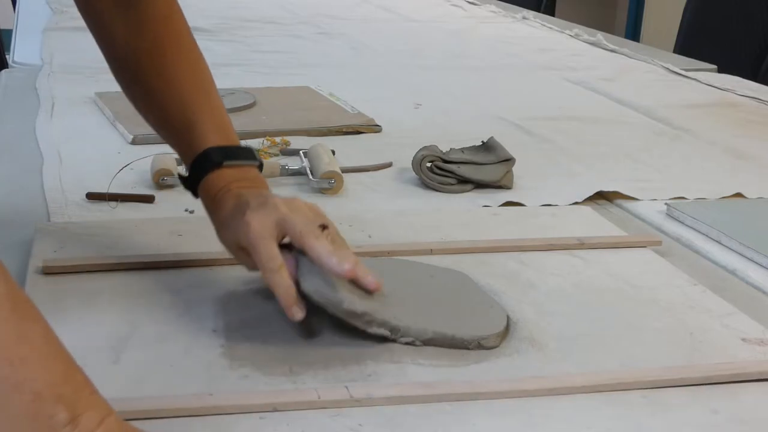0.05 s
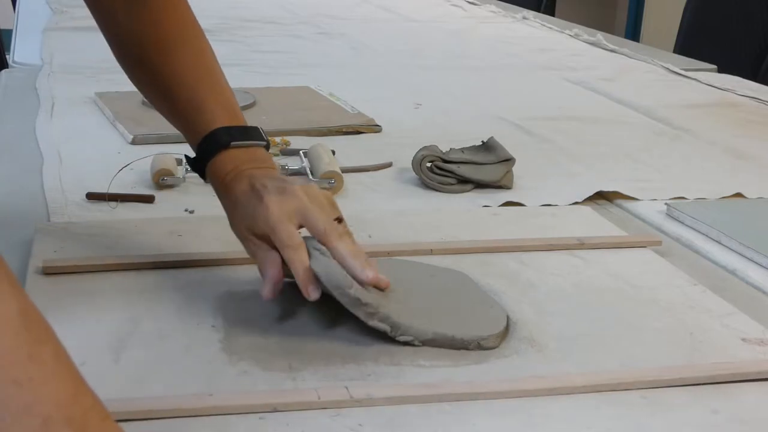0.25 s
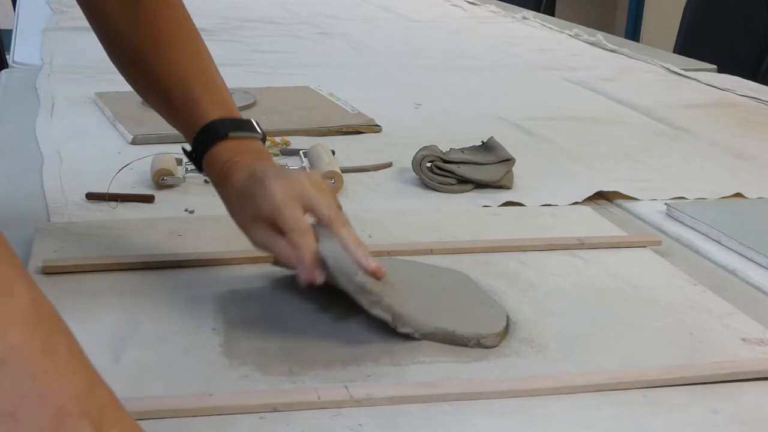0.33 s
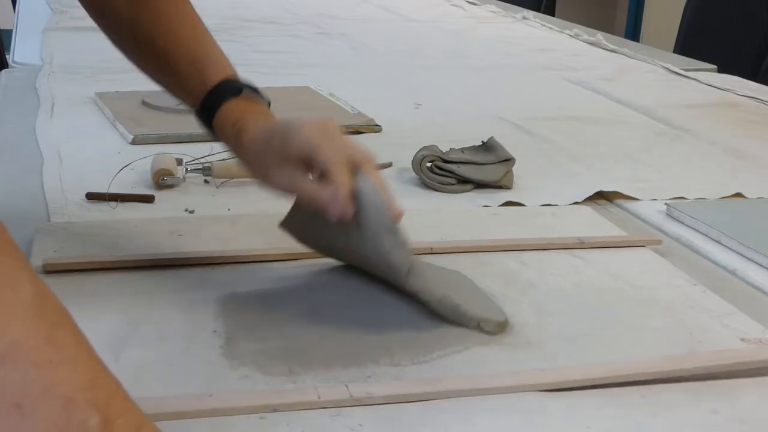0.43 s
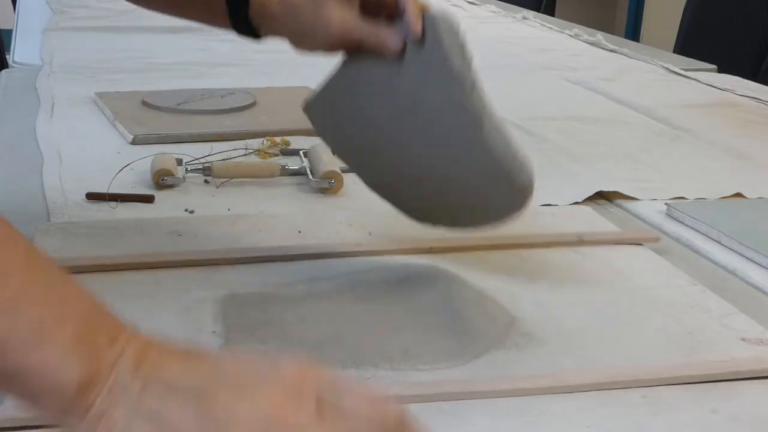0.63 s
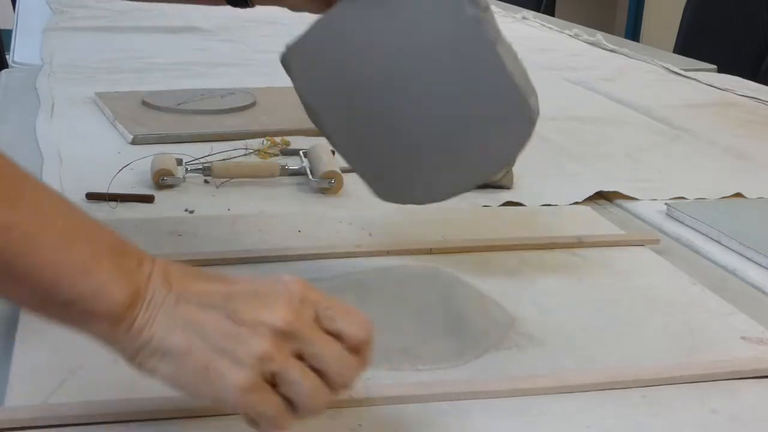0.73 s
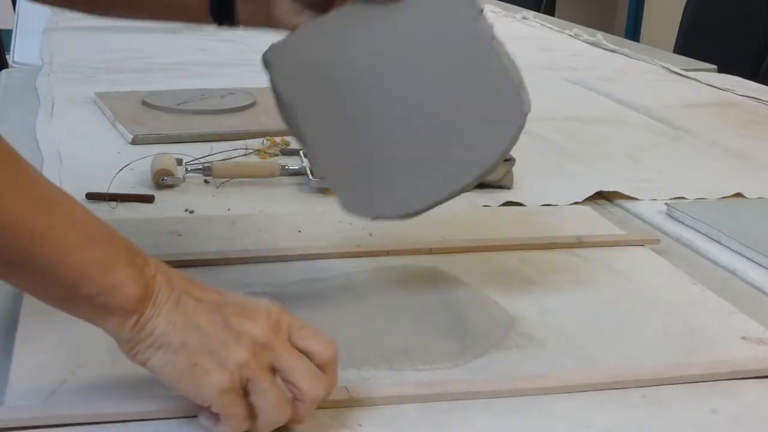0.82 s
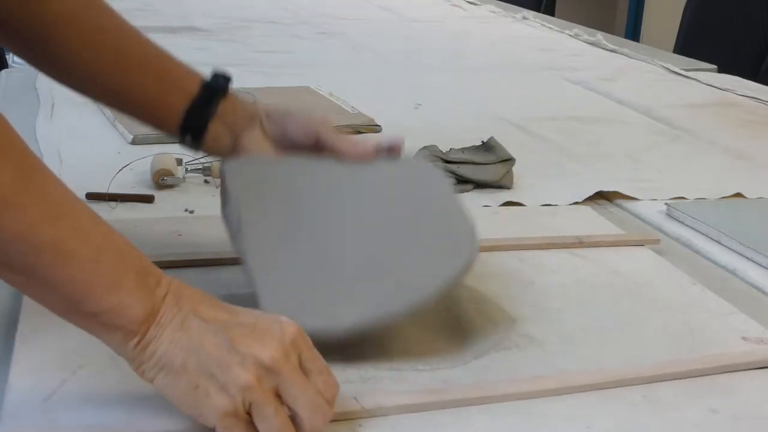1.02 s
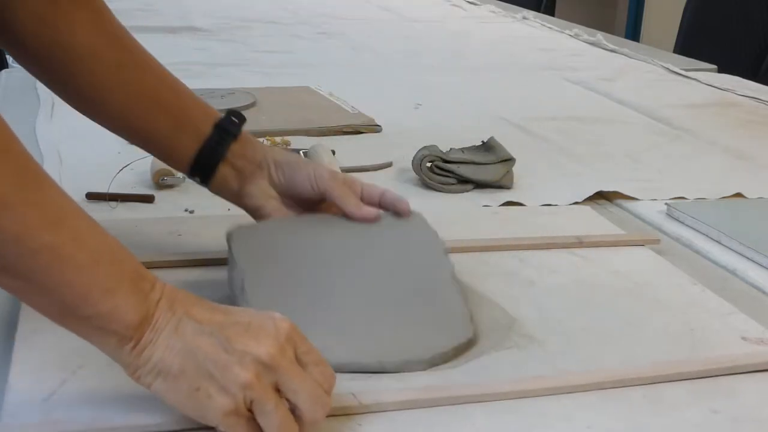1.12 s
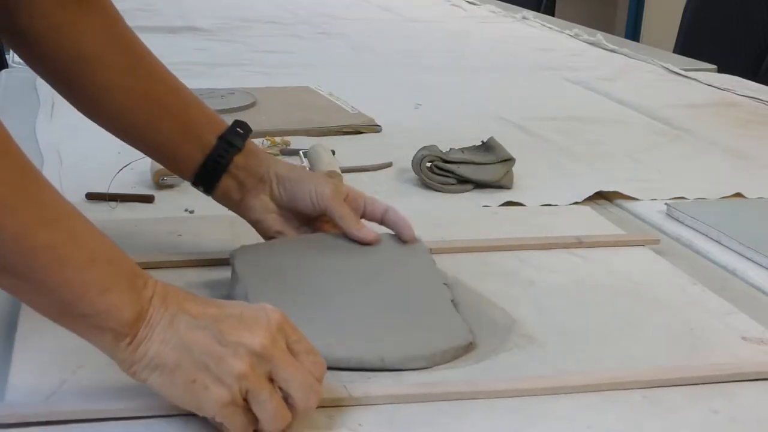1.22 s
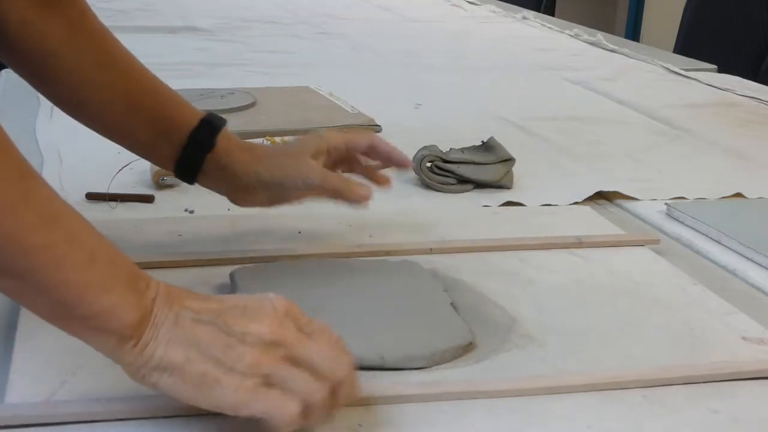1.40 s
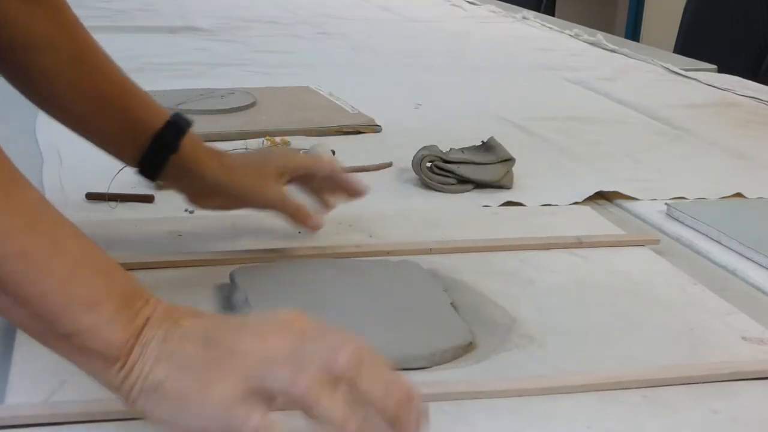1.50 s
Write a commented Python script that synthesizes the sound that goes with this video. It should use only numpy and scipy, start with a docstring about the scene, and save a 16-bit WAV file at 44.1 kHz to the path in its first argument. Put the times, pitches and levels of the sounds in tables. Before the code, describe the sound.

A heavy clay slab thuds onto a wooden worktable, then hands softly rub and turn it.

```python
"""Clay on a wooden worktable, heard close in stereo, in a studio with murmuring ventilation.
Hands slide on the clay; at 0.2 s an edge of the heavy slab scuffs and slaps down, then the whole
weight thuds and the top judders. From about 0.5 s hands peel, rub and turn the clay, with soft,
dull bumps and a few squeaks of damp skin. Near 1.4 s they set it down with a firmer bump.
The room rings behind each blow."""
import sys
import numpy as np
from scipy import signal
from scipy.fft import rfft, irfft
from scipy.io import wavfile

SR = 44100
rng = np.random.default_rng(int(sys.argv[2]) if len(sys.argv) > 2 else 0)


def dump(signal):
    """Clip the signal to [-1, 1] and save it as 16-bit WAV at the path in sys.argv[1]."""
    limited = np.clip(np.atleast_2d(signal).T, -1, 1)
    pcm = np.round(limited * 32767).astype(np.int16)
    wavfile.write(sys.argv[1], SR, pcm)


N = 68355


def amp(db):
    """Decibels to gain."""
    return 10 ** (np.asarray(db) / 20)


def unit(x):
    """Scales to rms 1."""
    return x / np.sqrt(np.mean(x ** 2) + 1e-20)


def read(points, hz, column=1):
    """Reads one column of a table along log frequency."""
    columns = np.transpose(points)
    return np.interp(np.log(hz + 1), np.log(columns[0]), columns[column])


def add(mix, start_s, sound):
    """Mixes a sound in at a time."""
    part = mix[max(round(start_s * SR), 0):][:len(sound)]
    part += sound[:len(part)]


def cut(x, hz, kind="low", order=2):
    """Low-pass or high-pass."""
    return signal.sosfilt(signal.butter(order, hz, kind, fs=SR, output="sos"), x)


def colour(noise, spectrum):
    """Gives a noise a spectrum, at rms 1."""
    gain = amp(read(spectrum, np.fft.rfftfreq(N, 1 / SR)))
    return unit(irfft(rfft(noise) * gain, N))


def burst(samples, decay_s):
    """Dying noise with an energy of 1."""
    noise = rng.standard_normal(samples) * np.exp(-np.arange(samples) / SR / decay_s)
    return noise / np.linalg.norm(noise)


def ring(modes):
    """Dying tones after one tap; a mode's level is its gain at resonance."""
    t = np.arange(SR // 2) / SR
    return sum(amp(db - 60 * t / t60) * 2 * np.log(1000) / (t60 * SR) * np.cos(2 * np.pi * hz * t)
               for hz, db, t60 in modes)


# room tone of the studio (f/Hz, relative level/dB)
VENT_SPECTRUM = [(25, -32), (50, -8), (90, -5), (150, 2.5), (300, -12), (365, -7), (391, 4.5), (420, -13.5),
                 (550, -9), (1000, -15), (2500, -23.5), (5000, -30), (8000, -43.5), (10500, -41.5),
                 (15500, -56)]
# its likeness at the left and right microphones (f/Hz, coherence/0-1)
VENT_COHERENCE = [(30, 0.96), (150, 0.94), (1000, 0), (4000, 1), (10000, 0.8)]
def ventilation():
    """A steady murmur of air behind everything, narrow in the bass and widest near 1 kHz."""
    mid, side = (colour(noise, VENT_SPECTRUM) for noise in rng.standard_normal((2, N)))
    coherence = read(VENT_COHERENCE, np.fft.rfftfreq(N, 1 / SR))
    mid = irfft(rfft(mid) * np.sqrt((1 + coherence) / 2), N)
    side = irfft(rfft(side) * np.sqrt((1 - coherence) / 2), N)
    return amp(-53) * np.array([mid + side, mid - side])


# reverberation from all round the studio (f/Hz, t60/s, level/dB, side against mid/dB)
ROOM_BANDS = [(80, 0.86, -1, -22), (166, 0.37, -7, -25), (346, 0.5, -4.5, -12), (650, 0.64, -14, -7.5),
              (1280, 0.61, -6, -8), (3140, 0.59, -10, -11), (6300, 0.62, -3.5, -24),
              (10800, 0.58, -2.5, -1)]
def room_tail(x, rise_s=0.0083):
    """One diffuse tail, each band dying at its own speed and with its own stereo width."""
    hz, t, bands = signal.stft(rng.standard_normal((2, SR)), SR, nperseg=256)
    t60, level_db, side_db = (read(ROOM_BANDS, hz, column)[:, None] for column in (1, 2, 3))
    equal_energy = np.sqrt(2 * np.log(1000) / (t60 * SR))
    bands *= amp(level_db - 60 * t / t60) * equal_energy
    bands[1] *= amp(side_db)
    rise = np.minimum(np.arange(SR) / SR / rise_s, 1)
    tail = signal.istft(bands, SR, nperseg=256)[1][:, :SR] * rise
    mid, side = signal.fftconvolve(x[None], tail, axes=1)[:, :N]
    return np.array([mid + side, mid - side])


def reverberation(x, tails=3, split_hz=1190, bass_turn_s=0.016, treble_turn_s=0.002):
    """Successive contacts excite different echo patterns: tails take turns, faster in the treble."""
    def share(turn_s, k):
        away = abs((np.arange(N) / SR / turn_s - k) % tails - tails / 2)
        return np.cos(np.pi / 2 * np.minimum(away, 1))
    bass, treble = cut(x, split_hz, order=3), cut(x, split_hz, "high", order=3)
    return sum(room_tail(bass * share(bass_turn_s, k) + treble * share(treble_turn_s, k))
               for k in range(tails))


# resonances between the studio's walls (f/Hz, level/dB, t60/s)
ROOM_MODES = [(173, -7, 0.77), (272.4, -5.5, 0.81), (340, -10.5, 0.92), (393, -5.5, 1), (541, -0.5, 0.56)]
def standing_waves(x):
    """The room hums on at a few low pitches."""
    return signal.fftconvolve(x, ring(ROOM_MODES))[:N]


# floor and walls, heard at the microphones after the direct sound (t/s, level/dB)
REFLECTIONS = [(.0085, -28), (0.018, -20.5), (0.0365, -22), (0.044, -17.5)]
def early_echoes(x):
    """The first dull reflections off floor and walls."""
    out, dull = np.zeros(N), cut(x, 1690, order=1)
    for delay_s, db in REFLECTIONS:
        add(out, delay_s, amp(db) * dull)
    return out


def scatter(x):
    """Sideways reflections off the nearby tools and top, opposite in sign left and right."""
    reflected = signal.fftconvolve(x, burst(1024, decay_s=0.0011))[:N]
    side = cut(reflected, 500, "high", order=1)
    return amp(-16) * np.array([side, -side])


# hands and clay sliding, close by (t/s, length/s, drag level/dB, rub level/dB, hiss level/dB)
HAND_STROKES = [(-.06, 0.15, -52, -53, -72), (0.07, 0.37, -56, -79, -68),
                (0.437, 0.19, -65.5, -50.5, -61.5), (0.514, 0.098, -49, -56, -63),
                (0.607, 0.09, -44.5, -60.5, -80), (0.834, 0.11, -55.5, -58, -62.5),
                (0.902, 0.13, -61.5, -65.5, -63.5), (1.012, 0.27, -56, -61.5, -69.5),
                (1.13, 0.073, -65, -72, -67.5), (1.063, 0.028, -71, -57, -60.5),
                (1.166, 0.12, -57.5, -69, -76), (1.239, .13, -60, -55.5, -71.5),
                (1.318, 0.087, -64, -58.5, -66), (1.385, 0.082, -42, -59.5, -86)]
# spectra of the three parts of the friction (f/Hz, relative level/dB)
DRAG_SPECTRUM = [(40, -58), (100, -16), (150, -6.5), (210, -24.5), (280, 0.5), (390, 0.5), (540, 1.5),
                 (750, -13), (1500, -55), (15000, -92)]
RUB_SPECTRUM = [(100, -33), (450, -7), (800, 6.5), (1600, 2), (2800, -2), (4500, -11.5), (7000, -20.5),
                (15000, -33.5)]
HISS_SPECTRUM = [(500, -40), (2500, -3), (5500, 2), (7800, -8), (10000, -5.5), (12500, -20.5), (15500, -23)]
def sliding(fade_share=0.37, grit_per_s=230, grit_gain=0.34):
    """Gritty friction under each stroke: low drag, skin rub and fine hiss."""
    t, out = np.arange(N) / SR, np.zeros(N)
    for k, spectrum in enumerate([DRAG_SPECTRUM, RUB_SPECTRUM, HISS_SPECTRUM]):
        grit = unit(rng.standard_normal(N) * (rng.random(N) < grit_per_s / SR))
        power = np.zeros(N)
        for start_s, length_s, *levels_db in HAND_STROKES:
            progress = (t - start_s) / length_s
            fade = np.clip(np.minimum(progress, 1 - progress) / fade_share, 0, 1)
            power += (amp(levels_db[k]) * fade) ** 2
        out += np.sqrt(power) * colour(rng.standard_normal(N) + grit_gain * grit, spectrum)
    return out


# damp skin on clay, close by (t/s, length/s, f/Hz, level/dB, pitch wobble/share of f)
SKIN_SQUEAKS = [(0.879, 0.065, 1553, -61, 0.12), (0.952, 0.057, 2206, -64.5, 0.0037),
                (1.181, 0.07, 276, -52, 0.035)]
def squeaks():
    """Skin sticks and slips, making short tones of unsteady pitch."""
    out = np.zeros(N)
    for start_s, length_s, hz, db, depth in SKIN_SQUEAKS:
        wobble = unit(cut(rng.standard_normal(N), 122))[:round(length_s * SR)]
        turns = np.cumsum(hz * (1 + depth * wobble)) / SR
        tone = np.sin(2 * np.pi * turns) * signal.windows.tukey(len(turns), 0.5)
        add(out, start_s, amp(db) * unit(tone))
    return out


def wood_response(modes, tap_db, dense_db, dense_t60):
    """Wood answers a tap with the tap itself, its modes and dense, short-lived overtones."""
    out = ring(modes)
    t = np.arange(len(out)) / SR
    dense = cut(rng.standard_normal(len(t)), 266, "high") * amp(-60 * t / dense_t60)
    out += amp(dense_db) * dense / np.linalg.norm(dense)
    out[0] += amp(tap_db)
    return out


# the worktable's low modes under a push and bright modes under a slap (f/Hz, level/dB, t60/s)
LOW_MODES = [(205.7, -10, 0.14), (274, 1, 0.062), (340.9, 7, 0.2), (393, -2, 0.28), (501, -1, 0.27),
             (521.2, 3.5, 0.099), (574.3, 6, 0.12), (674.5, 0, 0.17), (804, 6.5, 0.061), (866, 5.5, 0.07),
             (935, 1, 0.08), (1230, -6.5, 0.028), (1495, 4, 0.14)]
BRIGHT_MODES = [(1370, -4, 0.012), (1827, -10.5, 0.037), (2237, -2, 0.05), (2668, 0, 0.072),
                (2966, 4, 0.036)]
def strike_top(push, slap):
    """Rings one spot of the top; the dense overtones differ at every spot."""
    low_wood = wood_response(LOW_MODES, tap_db=-4.5, dense_db=-3, dense_t60=0.035)
    bright_wood = wood_response(BRIGHT_MODES, tap_db=-7, dense_db=-10.5, dense_t60=0.023)
    low = cut(signal.fftconvolve(push, low_wood), 151, "high", order=4)
    bright = cut(signal.fftconvolve(slap, bright_wood), 790, "high")
    return low + bright


def bending_waves(x, travel_s=0.00048, at_hz=990):
    """Blows spread through the top as bending waves, lower notes arriving later."""
    turns = 2 * travel_s * np.sqrt(at_hz * np.fft.rfftfreq(2 * N, 1 / SR))
    return irfft(rfft(x, 2 * N) * np.exp(-2j * np.pi * turns))[:N]


def judder(start_s=0.26, length_s=0.17, spots=5, knocks_per_s=300):
    """The top and its tools shake after the heavy blow: small random knocks die away at several spots."""
    out, age = np.zeros(N), np.arange(round(length_s * SR)) / SR
    for _ in range(spots):
        gaps_s = rng.uniform(0.2, 1.8, 128) * spots / knocks_per_s
        onsets = np.round((np.cumsum(gaps_s) - gaps_s[0] / 2) * SR).astype(int)
        knocks = np.bincount(onsets, rng.choice([-1, 1], len(onsets)), len(age))[:len(age)]
        rumble = cut(knocks * amp(9.5 - 67.5 * age), 506, order=3)
        clatter = cut(knocks * amp(-3.5 - 113 * age), 3900, order=3)
        add(out, start_s, strike_top(cut(rumble, 121, "high"), clatter))
    return out


def thump(hz, sag_share=0.12, settle_s=0.013, rise_s=0.003, t60=0.21):
    """The slab bounces on the springy top: a low note, set by how it lies, that sags as it settles."""
    t = np.arange(SR // 2) / SR
    turns = np.cumsum(hz * (1 + sag_share * np.exp(-t / settle_s))) / SR
    return np.sin(2 * np.pi * turns) * (1 - np.exp(-t / rise_s)) * amp(-60 * t / t60)


# clay meeting the table in front of the microphones (t/s, push level/dB, push cutoff f/Hz,
# slap level/dB, slap cutoff f/Hz, squash/0-1, thump level/dB, thump f/Hz)
CLAY_BLOWS = [(0.1837, -1, 410, -10.5, 3100, 1, -27.5, 166.8), (0.1929, 5, 785, -3, 3000, 0.92, -33, 169),
              (0.2031, -2, 890, 6.5, 2630, 0.99, -35, 143), (0.2103, 5.5, 940, 9.5, 2420, 0.9, -39, 171),
              (0.2165, 18.5, 1520, 17.5, 4900, 0.3, -22.5, 173.9),
              (0.2294, 26.5, 820, 18, 3080, 0.27, -30, 109.2), (0.2322, 22, 775, 8, 2410, 0.2, -29, 140.5),
              (.590, -10.5, 860, -19, 3030, 1, -63, 162), (0.615, -0.5, 560, -13.5, 1960, 1, -40, 149.4),
              (0.63, -7.5, 730, -24, 2000, 0.4, -45, 143), (0.766, -28, 600, -15, 1830, 0.97, -78, 147),
              (.8190, -2, 475, -23.5, 3900, 0.78, -40, 182.6), (.849, -4, 437, -25, 3960, 0.3, -52, 169),
              (1.0556, 0.5, 460, -13.5, 2340, 0.45, -32, 152),
              (1.067, -6, 580, -26, 4130, 0.8, -42.5, 150.3), (1.3706, 4, 440, -16, 1990, 0.9, -27, 178.8),
              (1.3775, 17.5, 417, -5, 2250, 0.7, -26, 171.3), (1.3833, 11.5, 414, -31, 1850, 0.7, -44, 162),
              (1.3943, 6.5, 452, -18.5, 2300, 0.6, -37, 201.6),
              (1.423, 1.5, 620, -21.5, 3550, 0.9, -57, 184)]
def clay_blows(full_tick_from_db=16.5):
    """Each blow is a soft push of the clay's weight, a brighter slap of its wet face and a low thump."""
    out, tap = np.zeros(N), signal.unit_impulse(2048)
    for start_s, push_db, push_hz, slap_db, slap_hz, squash, thump_db, thump_hz in CLAY_BLOWS:
        # squashing smears the slap; only hard, clean slaps spit a thin wet tick
        contact = np.sqrt(1 - squash ** 2) * tap + squash * burst(len(tap), decay_s=0.01)
        tick_gain = amp(-15.5 + min(slap_db - full_tick_from_db, 0)) * (1 - squash) ** 2
        tick = tick_gain * cut(tap, 9270, order=4)
        push = amp(push_db) * cut(tap, push_hz, order=5)
        slap = amp(slap_db) * (cut(contact, slap_hz, order=5) + tick)
        add(out, start_s, strike_top(push, slap))
        add(out, start_s, amp(thump_db) * thump(thump_hz))
    return out


def scene():
    """Table and hands close and central, the studio around them."""
    near = bending_waves(clay_blows() + judder()) + sliding() + squeaks()
    room = early_echoes(near) + standing_waves(near) + reverberation(near)
    balance = amp([[-0.05], [0.05]])  # left, right
    return (near + room + ventilation() + scatter(near)) * balance


def record(dry, low_hz=54.7, top_hz=15600):
    """Rounds off the highest peaks, then trims the deepest bass and the top."""
    rounded = dry / (1 + dry ** 6) ** (1 / 6)
    low_pass = signal.firwin(255, top_hz, window=("kaiser", 9), fs=SR)
    return signal.oaconvolve(cut(rounded, low_hz, "high"), low_pass[None], "same")


dry = scene()
out = record(dry)
dump(out)
```